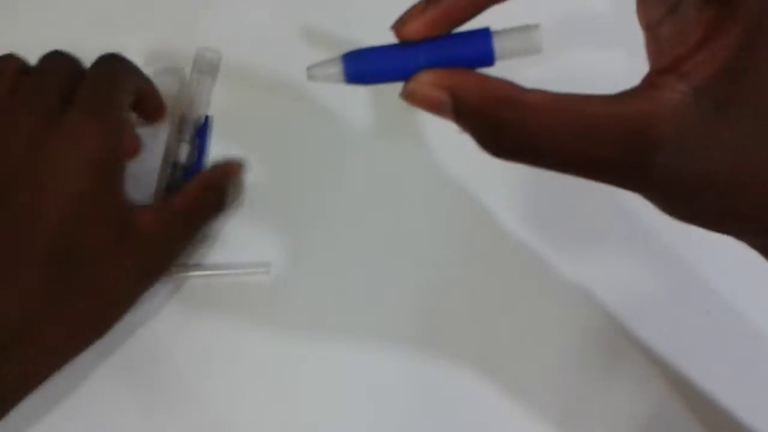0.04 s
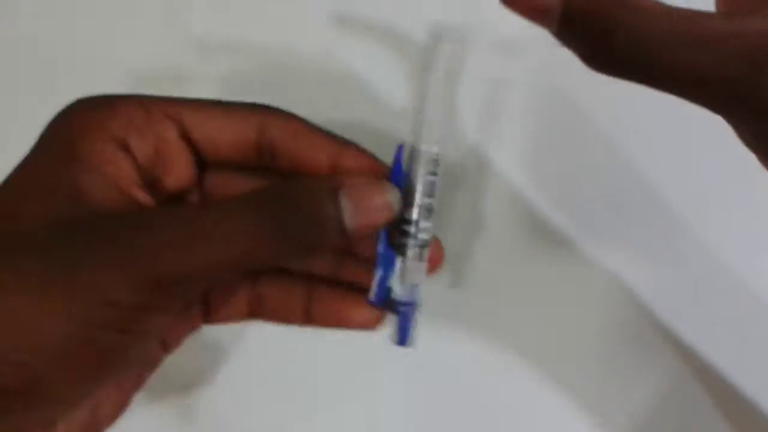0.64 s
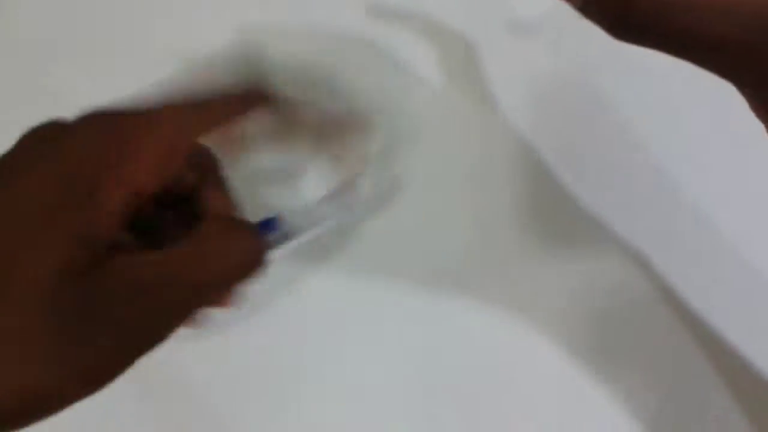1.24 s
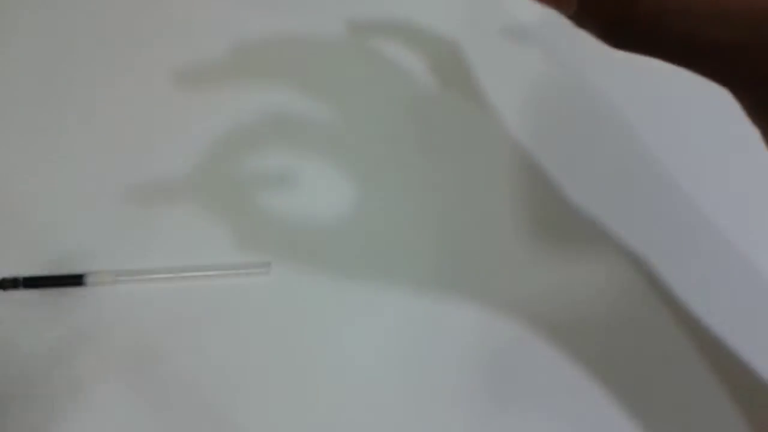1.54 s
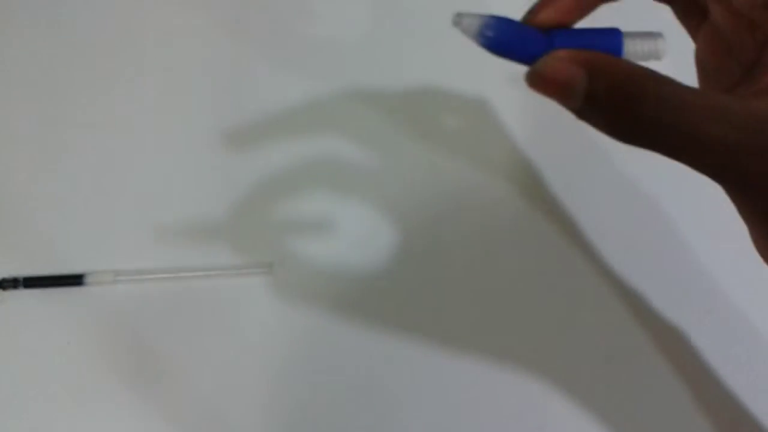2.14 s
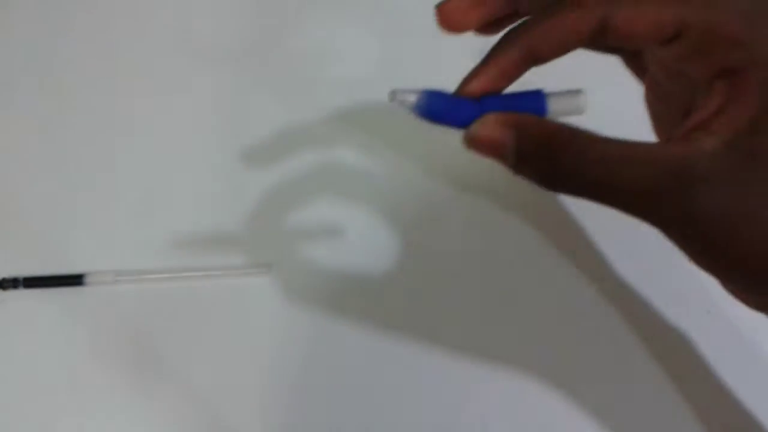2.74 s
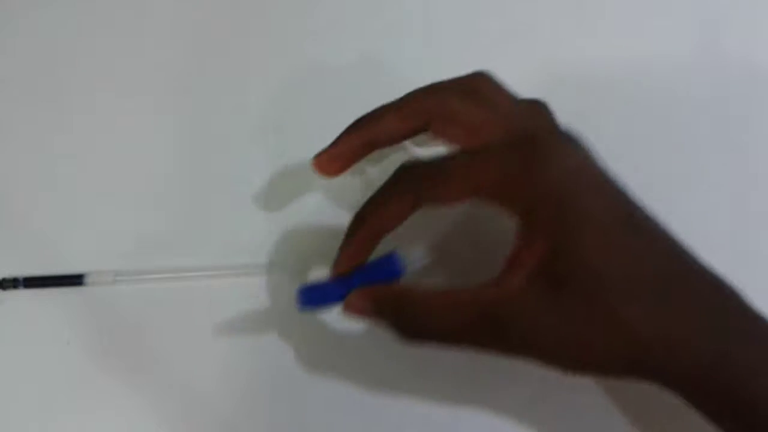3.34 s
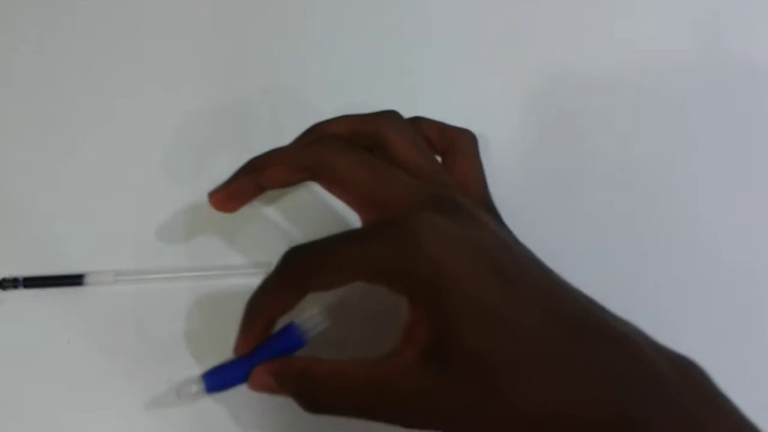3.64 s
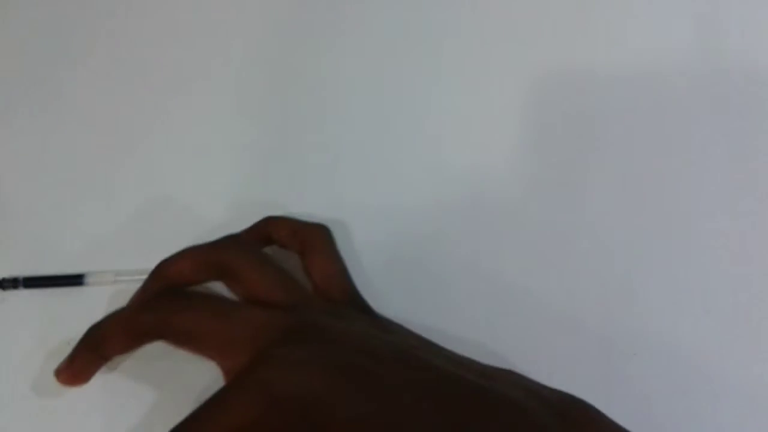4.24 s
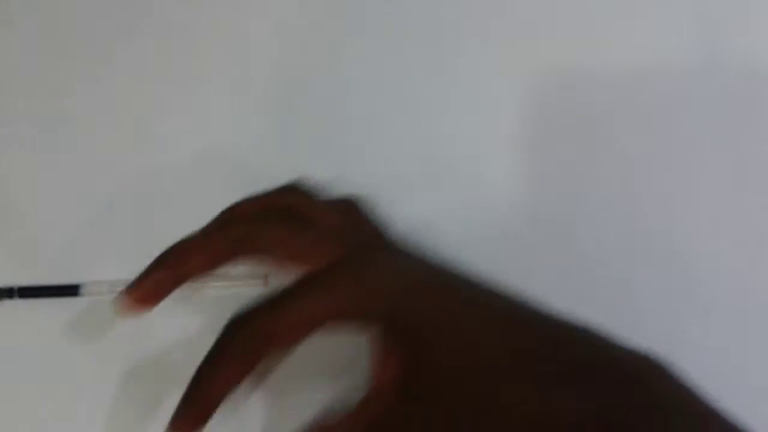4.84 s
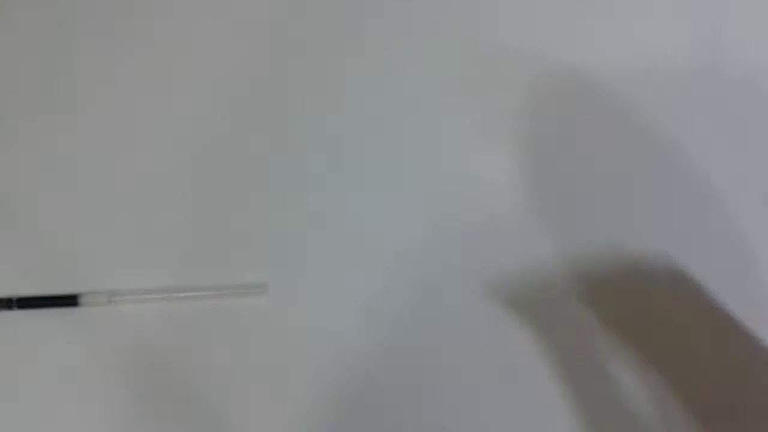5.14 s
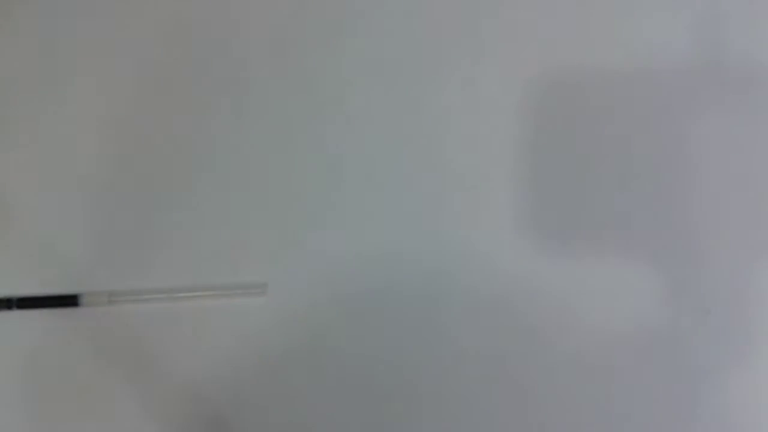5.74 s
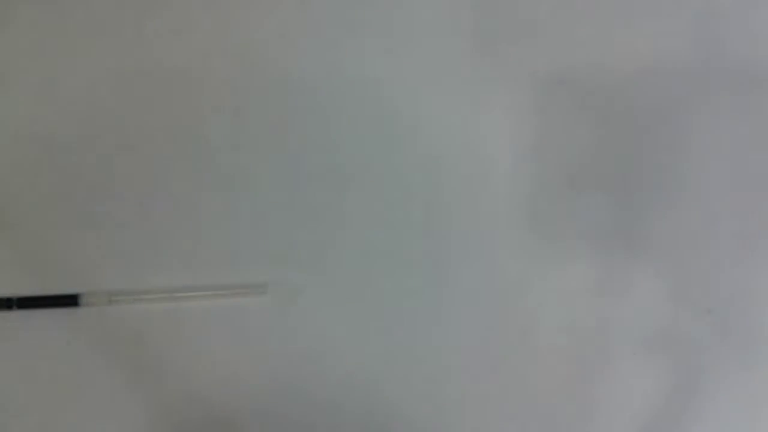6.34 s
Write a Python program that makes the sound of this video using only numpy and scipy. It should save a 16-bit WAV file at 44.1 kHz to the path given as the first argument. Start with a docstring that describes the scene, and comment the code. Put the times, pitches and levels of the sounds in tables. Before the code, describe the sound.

Plastic pen parts rub, click and knock on a table, with one loud sharp snap followed by light rattling.

```python
"""Fingers rub softly over low room noise, then a plastic pen barrel knocks and slides on a papered table.
Close up in a small room, the pen's parts scuff, squeak and tick. About two seconds in, one springs
past its catch with a loud snap; the loose grip section clinks and rattles, and more knocks follow.
The microphone rings near 6 kHz, and its gain control ducks the room noise after the snap."""
import sys
import numpy as np
from scipy import signal
from scipy.fft import rfft, irfft, next_fast_len
from scipy.io import wavfile
from scipy.ndimage import uniform_filter1d, minimum_filter1d

SR = 44100
rng = np.random.default_rng(int(sys.argv[2]) if len(sys.argv) > 2 else 0)


def wav_record(signal):
    """Record a signal, one row per channel, as 16-bit PCM in the file named by sys.argv[1]."""
    frames = np.transpose(np.atleast_2d(signal))
    bounded = np.clip(frames, -1, 1)
    # unit amplitude maps onto the largest positive 16-bit level
    quanta = np.round(bounded * 32767).astype(np.int16)
    wavfile.write(sys.argv[1], SR, quanta)


N = 290178
TIME = np.arange(N) / SR


def amp(db):
    """Decibels to gain."""
    return 10 ** (np.asarray(db) / 20)


def colour(x, points):
    """Minimum-phase EQ through points of f/Hz, gain/dB."""
    size = 2 * next_fast_len(len(x) // 2 + 2048)
    hz, db = np.transpose(points)
    bin_hz = np.fft.rfftfreq(size, 1 / SR)
    log_gain = np.log(amp(np.interp(np.log(bin_hz + 1), np.log(hz), db)))
    cepstrum = irfft(log_gain)
    cepstrum[1:size // 2] *= 2
    cepstrum[size // 2 + 1:] = 0
    return irfft(rfft(x, size) * np.exp(rfft(cepstrum)))[:len(x)]


def ring(x, modes):
    """Parallel resonators driven by x, each given as f/Hz, width/Hz, gain/dB."""
    return sum(amp(db) * signal.lfilter(*signal.iirpeak(hz, hz / width, fs=SR), x + 1e-18)
               for hz, width, db in modes)


def add(track, s, sound):
    """Mix a sound into the track at s seconds."""
    start = int(s * SR)
    track[start:start + len(sound)] += sound[:N - start]


def swell(t, length_s, peak):
    """Speed of one hand gesture: from rest up to 1 at the share `peak` of its length, and back to rest."""
    return np.sin(np.interp(t / length_s, [0, peak, 1], [0, np.pi / 2, np.pi]))


def room_tone(level_db=-39.5):
    """The bed: low room noise under an even hiss, slowly sinking and swelling."""
    # room noise and microphone hiss: f/Hz, gain/dB
    spectrum = [(20, -20), (45, -9), (75, -8), (125, -5), (170, -5), (250, -4), (400, -8.5), (800, -7.5),
                (1300, -9.5), (2000, -16), (2800, -20), (5000, -23), (8500, -26), (15000, -26)]
    # room resonances standing out of the noise: f/Hz, width/Hz, gain/dB
    room_modes = [(120, 46, 2.5), (220.6, 12, -4), (313.5, 11, -3.5), (320, 10, -11.5), (558, 22, -4),
                  (660, 21, -7.5), (846, 32, -5.5), (1200, 14, -8.5), (1666, 12, -5.5)]
    # slow drift of the bed: t/s, gain/dB
    drift = [(0, 2.5), (.7, 2), (1.2, -0.5), (1.7, 2.5), (2.5, 1.5), (3.6, -1.5), (4.6, -1), (5.4, -0.5),
             (5.9, 1), (6.58, -1)]
    noise = colour(rng.standard_normal(N), spectrum)
    drift_db = np.interp(TIME, *np.transpose(drift))
    return amp(level_db + drift_db) * (noise + ring(noise, room_modes))


def reverb(x, t60_s=0.29, treble_t60_s=0.22, treble_hz=10000, build_s=0.005, gap_s=0.0007):
    """Small-room reflections thicken over the first milliseconds, then die away, the top end first."""
    # tone of the reflections: f/Hz, gain/dB
    tail_eq = [(60, -16), (130, 2), (250, 7.5), (600, -1.5), (2000, 2), (4500, -0.5), (6000, 1),
               (8000, 2.5), (11000, 5.5), (15000, 0.5)]
    t = TIME[:SR * 2 // 3]
    noise = rng.standard_normal(len(t))
    treble = signal.sosfiltfilt(signal.butter(2, treble_hz, "high", fs=SR, output="sos"), noise)
    tail = (noise - treble) * amp(-60 * t / t60_s) + treble * amp(-60 * t / treble_t60_s)
    tail *= 1 - np.exp(-(np.maximum(t - gap_s, 0) / build_s) ** 2)
    return signal.fftconvolve(x, colour(tail / np.linalg.norm(tail), tail_eq))[:N]


def pen_tube(drive, ring_db, overtone_db, pitch_hz=6145):
    """The drive plus the tube's ring; where it is struck and held sets the modes' balance and pitch."""
    # the tube's modes, lowest first, before tuning to pitch_hz: f/Hz, width/Hz, gain/dB
    tube_modes = [(6145, 102, 21), (9060, 88, 22), (10130, 260, 12.5), (14200, 390, 11)]
    tuned = [(hz * pitch_hz / tube_modes[0][0], width, db) for hz, width, db in tube_modes]
    return drive + amp(ring_db) * ring(drive, tuned[:1]) + amp(overtone_db) * ring(drive, tuned[1:])


def friction(grain_db):
    """Grainy noise at unit RMS: a tiny slip of uneven size every millisecond."""
    size = SR // 1000
    strengths = amp(grain_db * rng.standard_normal(N // size + 1))
    slips = np.repeat(strengths, size)[:N] * rng.standard_normal(N)
    return slips / np.std(slips)


def rubbing():
    """Fingers and paper rasp with the speed of each stroke; the sliding barrel sounds its air column."""
    # fingers stroking plastic and paper: start/s, length/s, level/dB
    strokes = [(0.091, 0.052, -55), (0.135, 0.16, -58), (.28, 0.81, -67), (1.04, 0.076, -62),
               (1.39, .12, -57.5), (1.6, 0.99, -60.5), (2.234, 0.32, -51), (2.549, 0.099, -49.5),
               (2.657, 0.24, -51.5), (2.877, 0.31, -61.5), (3.53, 0.18, -63), (3.81, 0.12, -63.5),
               (4.047, 0.24, -62), (4.196, 0.032, -55.5), (5.646, 0.48, -60), (6.152, 0.11, -55),
               (6.275, 0.074, -53.5)]
    # barrel dragged along fingers and paper: start/s, length/s, relative level/dB, peak/share of length
    slides = [(0.457, 0.54, -60, 0.091), (1.48, 0.39, -51, 0.52)]
    # tone of the rasp: f/Hz, gain/dB
    rasp_eq = [(100, -6.5), (800, 7), (2200, -5.5), (4500, 0.5), (7000, -1), (9000, -6), (15000, -12.5)]
    # air column of the hollow barrel: f/Hz, width/Hz, gain/dB
    barrel_modes = [(2630, 60, 10), (3480, 17, 18), (5000, 45, 7), (5900, 34, 14.5), (6460, 40, 9),
                    (6980, 41, 5), (7400, 45, 9), (7840, 38, 12), (9780, 30, 12)]
    stroking = sum(amp(db) * swell(TIME - s, length_s, peak=0.272) for s, length_s, db in strokes)
    sliding = sum(amp(db) * swell(TIME - s, length_s, peak) for s, length_s, db, peak in slides)
    rasp = colour(friction(grain_db=2.5) * stroking, rasp_eq)
    fingers = pen_tube(rasp, ring_db=-21.5, overtone_db=-22.5)
    drag = colour(friction(grain_db=3.5) * sliding, rasp_eq)
    return fingers + amp(-5) * (drag + ring(drag, barrel_modes))


def scuff(start_s=1.468, level_db=-40.5, attack_s=0.022, hold_s=0.02, fall_db_per_s=187):
    """The barrel scuffs the paper as it lands and quickly brakes."""
    # tone of the scuff: f/Hz, gain/dB
    scuff_eq = [(100, 2), (600, -2.5), (1500, 0.5), (2700, 1.5), (4500, -2), (6000, -2), (8200, -4.5),
                (10500, -11.5), (15000, -19)]
    attack = np.clip((TIME - start_s) / attack_s, 0, 1)
    braking_s = np.maximum(TIME - start_s - attack_s - hold_s, 0)
    envelope = attack * amp(level_db - fall_db_per_s * braking_s)
    return colour(friction(grain_db=1.5) * envelope, scuff_eq)


def squeaks():
    """Skin sticks and slips on plastic and paper, settling briefly on one rough pitch."""
    # squeak cues: t/s, length/s, f/Hz, width/Hz, level/dB
    cues = [(1.427, 0.0088, 4050, 1000, -53.5), (5.06, .12, 2775, 110, -69), (6.145, 0.022, 3620, 201, -60),
            (6.19, 0.028, 4350, 600, -69), (6.446, 0.032, 4670, 900, -60.5)]
    out = np.zeros(N)
    for s, length_s, hz, width_hz, db in cues:
        mode = [(hz, width_hz, 0)]
        noise = rng.standard_normal(SR // 2)
        tone = ring(ring(noise, mode), mode)[SR // 4:]  # skip the resonators' build-up
        progress = np.minimum(TIME[:len(tone)] / length_s, 1)
        add(out, s, amp(db) * np.sin(np.pi * np.sqrt(progress)) * tone / np.std(tone))
    return out


def contact(chatter_s, chatter_db):
    """One blow of unit energy: a spike, then the faces chatter briefly."""
    t = TIME[:SR // 10]
    blow = rng.standard_normal(len(t)) * np.exp(-t / chatter_s)
    blow *= amp(chatter_db) / np.linalg.norm(blow)
    blow[0] = 1
    return blow / np.linalg.norm(blow)


def contact_eq(blow, low_cut_hz, treble_db):
    """Small parts radiate little bass; soft contacts lose treble."""
    thin = signal.sosfilt(signal.butter(2, low_cut_hz, "high", fs=SR, output="sos"), blow)
    return colour(thin, [(5000, 0), (14000, treble_db)])


def ticks():
    """Light, dry ticks of plastic held tight: the fingers damp it, so nothing rings on."""
    # tick cues: t/s, level/dB, low cut/Hz, treble/dB
    cues = [(1.993, -19, 3500, -15), (3.0463, -25, 3000, -22), (4.2132, -25, 4000, -4),
            (4.3232, -32.5, 4500, -14), (4.383, -27, 5000, -10), (4.703, -22, 5000, -16),
            (5.1972, -20.5, 4200, -15), (5.2673, -15.5, 500, -27), (6.152, -26.5, 1000, -20),
            (6.2997, -23, 2000, -11)]
    out = np.zeros(N)
    for s, db, low_cut_hz, treble_db in cues:
        blow = amp(db) * contact(chatter_s=0.0018, chatter_db=-6)
        add(out, s, contact_eq(blow, low_cut_hz, treble_db))
    return out


def grip_tap(db, treble_db):
    """One light contact on the grip section."""
    blow = amp(db) * contact(chatter_s=0.0043, chatter_db=-5)
    return contact_eq(blow, low_cut_hz=1800, treble_db=treble_db)


def clinks():
    """The loosely held grip section rings freely; the fingers' hold shifts its pitch."""
    # clink cues: t/s, level/dB, f/Hz, treble/dB, ring/dB, overtones/dB
    cues = [(2.342, -26, 6450, -4, 3.5, -13), (2.492, -30.5, 6130, -7, 5, -7),
            (2.658, -28, 5980, -7, 3.5, -14), (2.7445, -31, 6190, 11, 1, -7),
            (2.7797, -38.5, 6370, 13, -1, -2), (2.8658, -27.5, 6180, -7.5, -1, 17.5),
            (2.8765, -18, 6060, -9, 1.5, 3), (3.98, -33, 6240, 8, 3, -5)]
    out = np.zeros(N)
    for s, db, pitch_hz, treble_db, ring_db, overtone_db in cues:
        add(out, s, pen_tube(grip_tap(db, treble_db), ring_db, overtone_db, pitch_hz))
    return out


def rattles(taps=14, gap_s=0.0088, jitter_share=0.25, scatter_db=0.5):
    """The loose grip section rattles in uneven runs of taps that swell and fade."""
    # rattle cues: start/s, length/s, level/dB, treble/dB, overtones/dB
    cues = [(2.544, 0.062, -41, 16, -8), (2.745, 0.14, -45, 7, -8), (2.853, 0.081, -29, -14, 6),
            (3.985, 0.03, -33.5, 1.5, 1)]
    out = np.zeros(N)
    for s, length_s, db, treble_db, overtone_db in cues:
        for k, (late, strong) in enumerate(rng.standard_normal(size=(taps, 2))):
            after_s = (k + jitter_share * late) * gap_s
            blow = swell(after_s, length_s, peak=0.23) * grip_tap(db + scatter_db * strong, treble_db)
            add(out, s + after_s, pen_tube(blow, ring_db=6.5, overtone_db=overtone_db))
    return out


def knocks():
    """Parts knock on each other or shake the table; those further from the microphone sound wetter."""
    # knock cues: t/s, level/dB, low cut/Hz, treble/dB, chatter/s, ring/dB, overtones/dB,
    # table/dB, reverb send/dB
    cues = [(0.4575, -3, 2780, -22, 0.00087, -12, -4.5, -25, -11),
            (0.4616, -11, 3000, -1.5, 0.003, -19, -7, -32, -18),
            (3.1097, -21, 1200, -4.5, 0.0058, -4.5, -8, -7, -7.5),
            (5.4147, -25.5, 2000, -19, 0.00078, -21, -22, -17, 4),
            (5.4174, -20, 3000, -6, 0.0037, -2.5, -34, -9.5, -9.5),
            (5.8352, -17, 1500, -24, 0.0011, -9, -25, -0.5, 1),
            (5.8366, -11, 2500, -2.5, 0.004, -8, -32, -17, -10.5)]
    # the table top's dull modes: f/Hz, width/Hz, gain/dB
    table_modes = [(141, 73, 16), (284, 103, 8), (543, 250, 15.5), (970, 200, 6), (1470, 88, 10),
                   (3250, 490, 3.5)]
    direct, send = np.zeros(N), np.zeros(N)
    for s, db, low_cut_hz, treble_db, chatter_s, ring_db, overtone_db, table_db, send_db in cues:
        blow = amp(db) * contact(chatter_s, chatter_db=9)
        clack = pen_tube(contact_eq(blow, low_cut_hz, treble_db), ring_db, overtone_db)
        thud = amp(table_db) * ring(blow, table_modes)
        add(direct, s, clack + thud)
        add(send, s, amp(send_db) * (clack + thud))
    return direct, send


def snap():
    """A part springs past its catch and rebounds; the crack fills the room, the ring stays close."""
    # the quick run of contacts: t/s, level/dB
    hits = [(2.1169, -13.5), (2.12, 18.5), (2.1214, -2), (2.1243, 8.5), (2.1281, -2), (2.13, 2.5)]
    # tone of the crack: f/Hz, gain/dB
    crack_eq = [(25, -1), (70, 3.5), (130, 5.5), (250, -12), (550, 3.5), (850, -4), (1250, 4), (2300, -4),
                (4000, 2), (9000, -2), (12500, -7.5), (15000, -9)]
    # modes of the snapping part: f/Hz, width/Hz, gain/dB
    part_modes = [(3260, 160, 5.5), (5230, 1300, 6.5), (6090, 770, 6), (9020, 620, 12), (14160, 300, 20)]
    blows = np.zeros(N)
    for s, db in hits:
        add(blows, s, amp(db) * contact(chatter_s=0.0036, chatter_db=-9))
    crack = colour(blows, crack_eq)
    ringing = ring(crack, part_modes)
    send = amp(-3) * crack + amp(-9) * ringing
    return crack + ringing, send


def scene():
    """Mono mix of the pen handling, its reverb and the room tone."""
    grip = clinks() + rattles()
    tick = ticks()
    handling = rubbing() + scuff() + squeaks()
    snap_direct, snap_send = snap()
    knock_direct, knock_send = knocks()
    reflections = reverb(snap_send + knock_send + amp(-6) * grip + amp(-11) * tick + amp(-8) * handling)
    return (snap_direct + knock_direct + grip + tick + handling + reflections + room_tone())[None]


def gain_control(x, ceiling_db=5.0, hold_s=0.45, release_db_per_s=58):
    """Ducks just ahead of a peak over the ceiling, holds, then comes back up."""
    over_db = np.maximum(20 * np.log10(np.abs(x) + 1e-9) - ceiling_db, 0)
    hold = int(hold_s * SR) | 1
    held_db = -minimum_filter1d(-over_db, hold, origin=hold // 2, mode="constant")
    release_db = release_db_per_s * TIME
    cut_db = np.maximum.accumulate(held_db + release_db) - release_db
    lookahead = SR // 1000
    gain_db = uniform_filter1d(minimum_filter1d(-cut_db, 2 * lookahead), lookahead)
    return x * amp(gain_db)


def record(dry, high_cut_hz=15050):
    """Microphone chain: port resonances, gain control, soft clipping of the peaks, a steep high cut."""
    # resonances of the microphone port: f/Hz, width/Hz, gain/dB
    port_modes = [(6204, 1110, 8), (14400, 590, -13)]
    ducked = gain_control(dry[0] + ring(dry[0], port_modes))
    high_cut = signal.ellip(10, .2, 70, high_cut_hz, fs=SR, output="sos")
    return signal.sosfilt(high_cut, np.tanh(ducked))[None]


dry = scene()
out = record(dry)
wav_record(out)
```